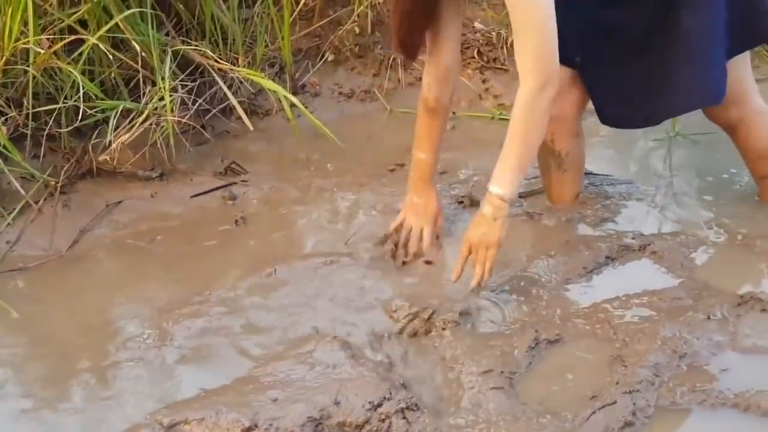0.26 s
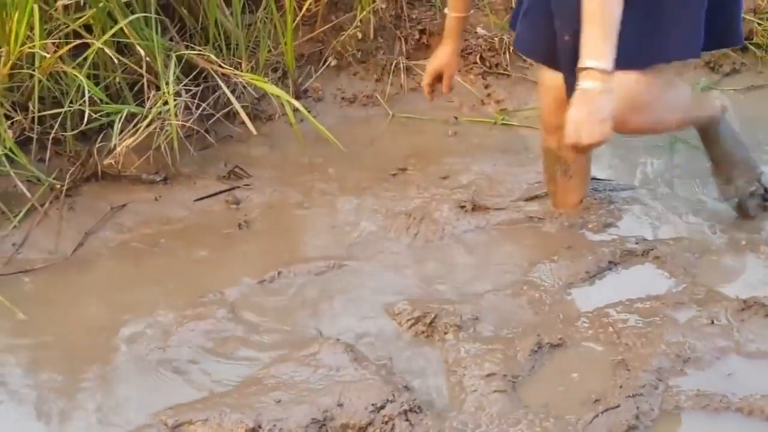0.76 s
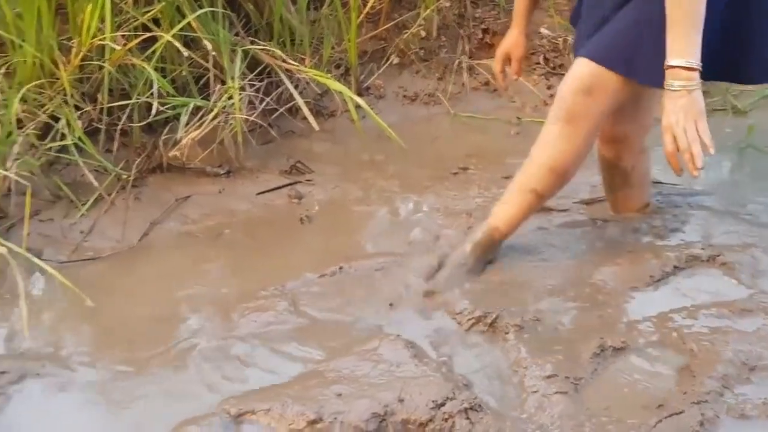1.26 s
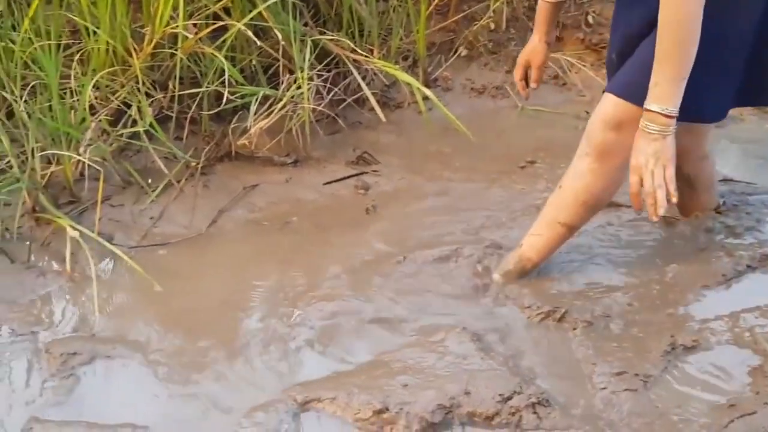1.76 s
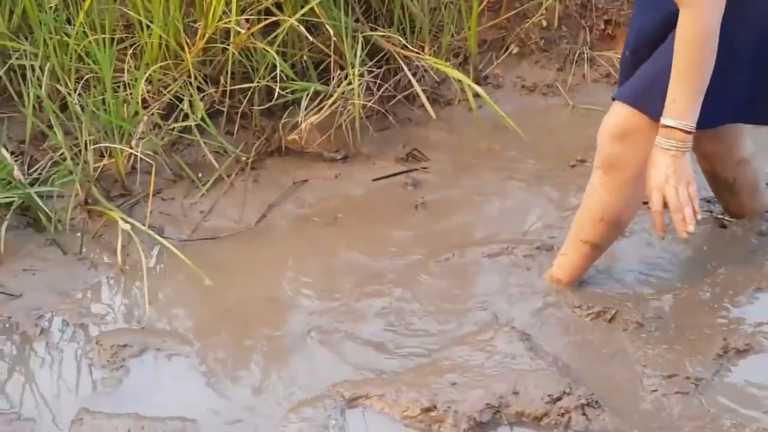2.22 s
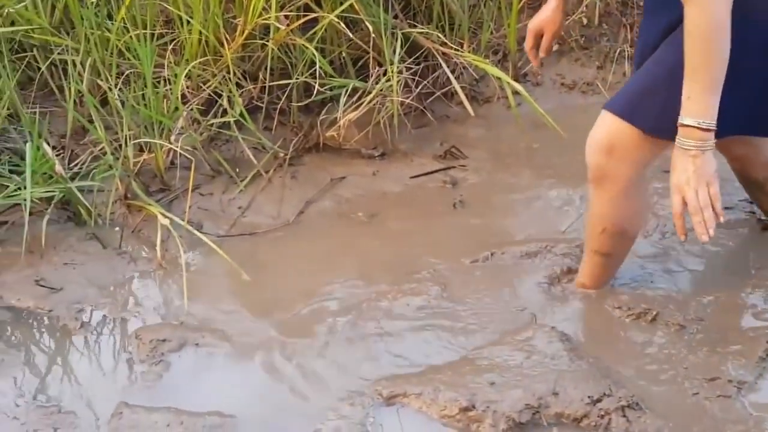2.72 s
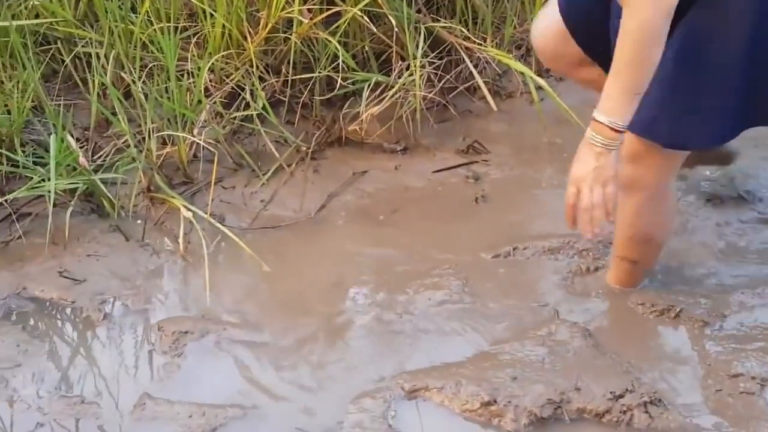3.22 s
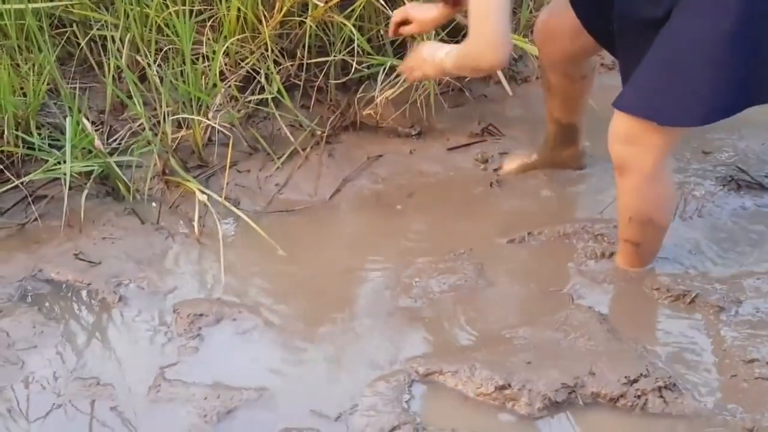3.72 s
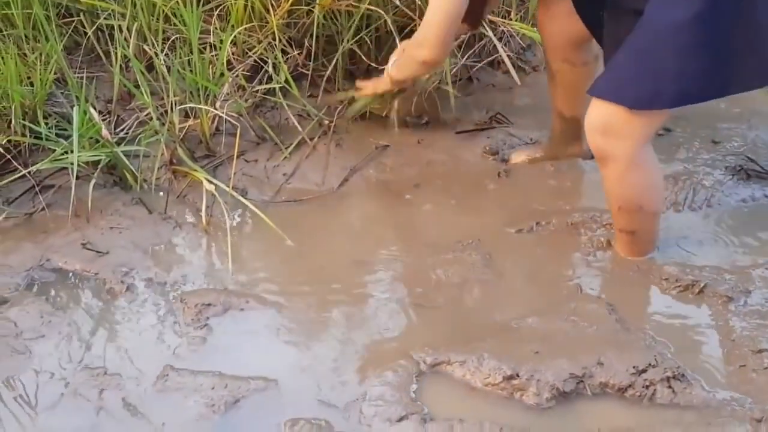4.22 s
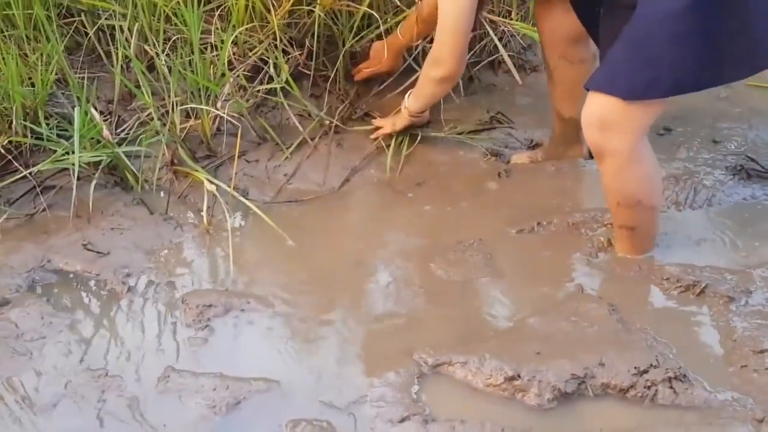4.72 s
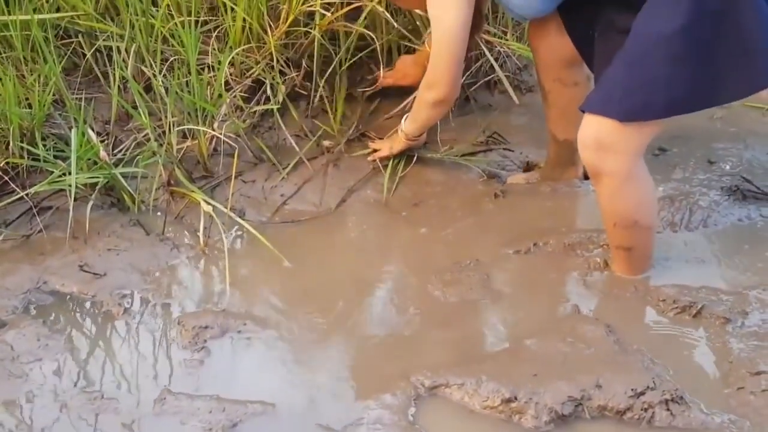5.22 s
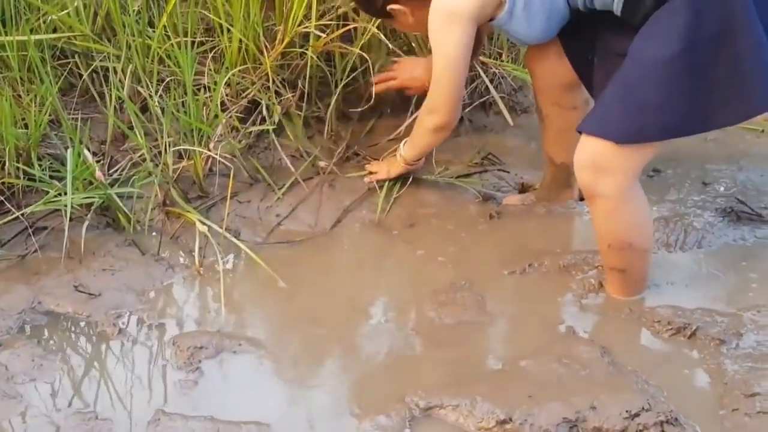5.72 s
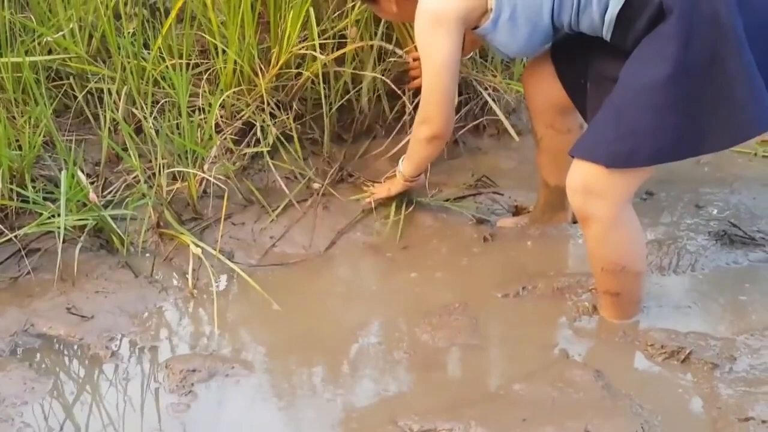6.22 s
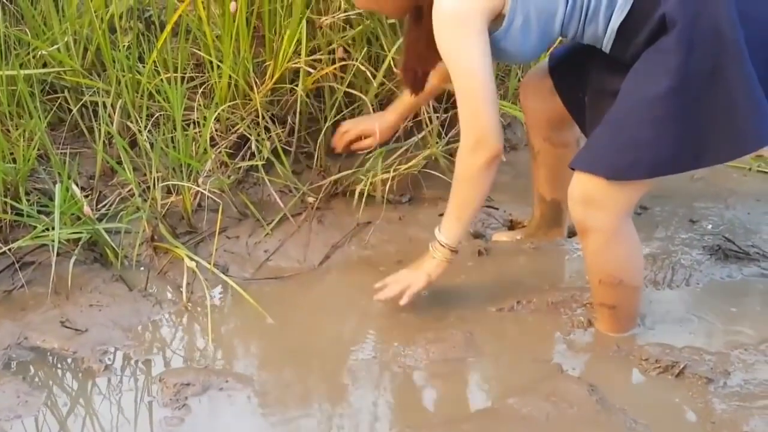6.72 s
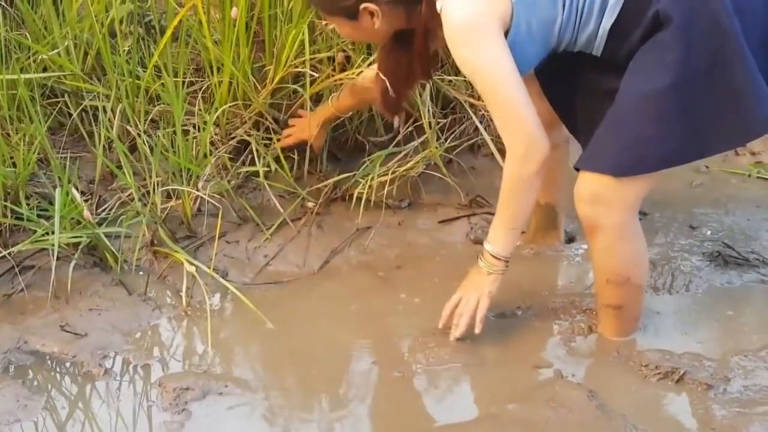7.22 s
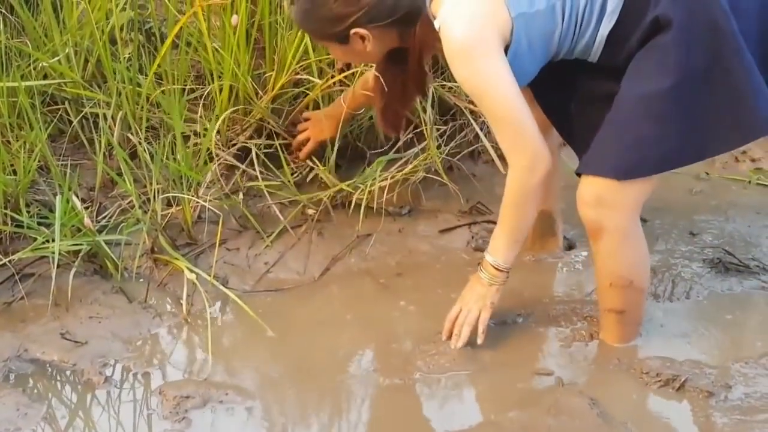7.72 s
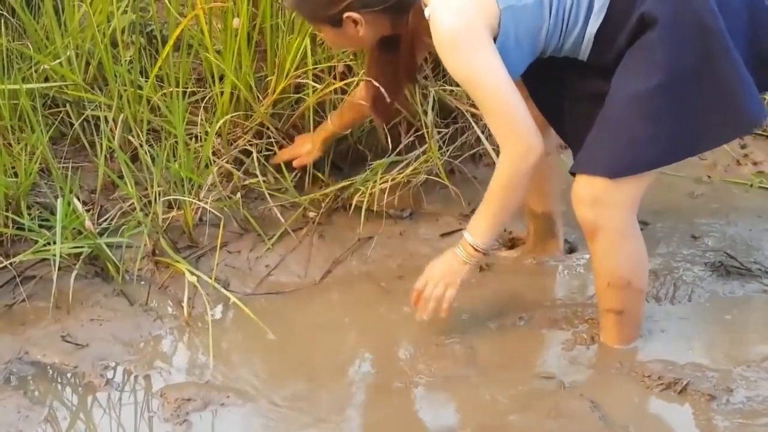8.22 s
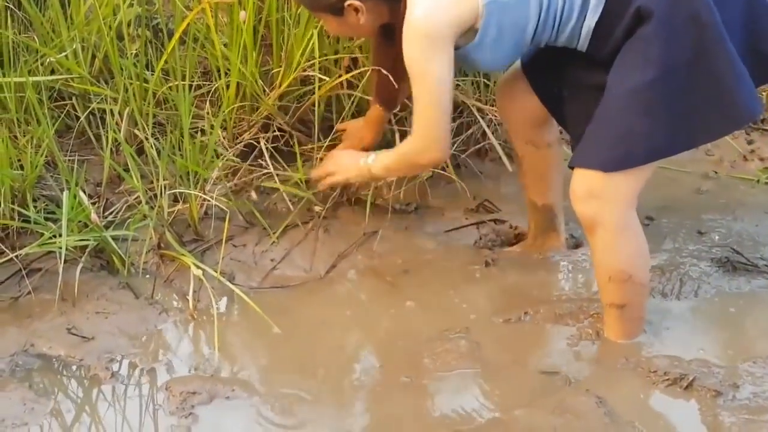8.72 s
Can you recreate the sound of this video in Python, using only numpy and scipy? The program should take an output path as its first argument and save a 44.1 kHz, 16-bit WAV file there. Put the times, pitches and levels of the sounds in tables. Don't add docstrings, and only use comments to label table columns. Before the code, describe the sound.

A wet, grassy field holds a continuous bright insect shimmer and a grainy far frog chorus, with small squeals throughout. From 0 to 1.5 s, dry leaves tick, stems snap and mud bubbles plop, while a small frog peeps faintly until 2.5 s. From 1.6 to 4.8 s a close frog on the right gives raspy, buzzing quacks, four to five per second, with crickets behind. Around 3-3.4 s a leg pushes through mud with a lumpy splash and plops; a sharp stem snap follows at 3.5 s. Tiny falling bird sweeps twitter at 4.7-5 s. Then it thins to chorus, squeals and brushed grass, with stems cracking near 6.1 s. From 6.4 to 7.9 s another frog quacks, overlapped by a deeper one until the end. Soft water stirs at 7 and 7.9 s. At 8.1-8.4 s gusts thud deeply on the left of the handheld microphone.

```python
import sys
import numpy as np
from scipy import signal
from scipy.io import wavfile
from scipy.ndimage import uniform_filter1d

SR = 44100
rng = np.random.default_rng(int(sys.argv[2]) if len(sys.argv) > 2 else 0)


def elevation(decibels):
    levels = np.asarray(decibels, float)
    return 10 ** (levels / 20)


def to_wav(sig):
    pcm = np.clip(np.atleast_2d(sig), -1, 1) * 32767
    pcm = np.round(pcm).astype(np.int16)
    wavfile.write(sys.argv[1], SR, pcm.T)


N = 395136

# frequency in Hz, level in dB.
FAR_INSECT_COLOUR = [(180, -62), (300, -14.5), (687, -18.5), (1270, -30), (1650, -21.5), (1830, -13.5),
                     (2230, -39), (3050, -14.5), (3670, -0.5), (5640, -23.5), (7860, -9.5), (8540, -16.5),
                     (9270, -13), (10600, -23.5), (15800, -47)]
CHORUS_COLOUR = [(820, -26.5), (1400, -16.5), (1860, -7.5), (2280, -8.5), (3140, 1), (3760, 1), (4340, -9),
                 (5200, -12.5), (6760, -29.5), (11400, -120)]
WIND_COLOUR = [(8.8, -42), (15, -47), (60, 3.5), (97, 2.5), (127, -1), (221, -18.5), (450, -33.5),
               (580, -71), (990, -120)]
BUFFET_COLOUR = [(10, -27), (22, -4), (40, 0), (55, -45)]
WADING_COLOUR = [(71, -30), (120, 22.5), (333, 0.5), (411, -18), (641, -0.5), (855, 2.5), (976, -2.5),
                 (1700, 2.5), (2210, -22), (3740, -120)]
GRASS_COLOUR = [(2650, -29), (4500, -1.5), (6460, -5.5), (7930, -0.5), (9380, -3.5), (10300, -2.5),
                (15000, -6), (15800, -5)]
# time in seconds, level in dB.
CHORUS_LEVEL = [(0.0, -49.5), (0.65, -56.5), (1.25, -48.5), (1.52, -55), (3.14, -54.5), (3.29, -48),
                (3.62, -57), (4.42, -53.5), (4.62, -56.5), (7.24, -56), (7.78, -49), (8.14, -57),
                (8.96, -49)]
# middle in seconds, half length in seconds, level in dB.
GUSTS = [
    (.85, 0.21, -60.5),
    (3.3, 0.088, -67),
    (4.5, 0.48, -61.5),
    (6.2, 0.15, -61),
    (8.08, 0.067, -52.5),
    (8.3, 0.072, -43),
    (8.55, 0.033, -52.5),
    (8.7, 0.075, -53),
]
# middle in seconds, half length in seconds, level in dB.
BUFFETS = [
    (.9, .5, -59),
    (8.3, 0.27, -52),
    (8.65, 0.12, -64),
]
# middle in seconds, half length in seconds, level in dB.
STEPS = [
    (.12, 0.1, -80),
    (0.758, 0.11, -83),
    (1.288, 0.1, -77),
    (2.988, 0.034, -60.5),
    (3.105, 0.055, -59.5),
    (3.278, 0.076, -53.5),
]
# middle in seconds, half length in seconds, level in dB.
STIRRING = [
    (5.08, 0.071, -66),
    (7.02, 0.079, -60),
    (7.86, 0.11, -61),
]
# middle in seconds, half length in seconds, level in dB.
BRUSHES = [(0.04, 0.072, -63.5), (0.346, 0.15, -62), (1.234, 0.29, -66.5), (3.116, 0.1, -62),
           (3.29, 0.1, -60), (3.517, 0.033, -56), (3.9, 0.061, -59), (4.353, 0.25, -60), (5.113, 0.13, -59),
           (5.966, 0.14, -56), (6.555, 0.16, -60.5), (7.064, 0.086, -58.5), (7.35, 0.17, -65.5),
           (7.602, 0.28, -63.5), (8.335, 0.2, -63.5), (8.63, 0.046, -55), (8.9, 0.38, -63)]
# frequency in Hz, width in Hz, level in dB.
THROAT_BANDS = [(3527, 327, 5), (2790, 920, -3), (3820, 1230, -2), (6540, 1140, -19.5)]
# start in seconds, effort in dB.
QUACKS_RIGHT = [(1.576, -43), (1.909, -34.5), (2.149, -33.5), (2.391, -34), (2.632, -34), (2.855, -33.5),
                (3.08, -33.5), (3.302, -34), (3.518, -34), (3.733, -34), (3.943, -34), (4.153, -34),
                (4.36, -33.5), (4.567, -34), (4.768, -34), (5.03, -45.5)]
QUACKS_BEHIND = [(.001, -40), (0.512, -49), (0.719, -41), (6.384, -38.5), (6.619, -38), (6.784, -41.5),
                 (6.946, -38.5), (6.991, -37.5), (7.17, -33.5), (7.351, -34), (7.521, -34.5),
                 (7.695, -33.5), (7.87, -33.5)]
QUACKS_DEEP = [
    (7.47, -49),
    (7.655, -45),
    (7.835, -47),
    (8.019, -40),
    (8.18, -38.5),
    (8.351, -38.5),
    (8.514, -38.5),
    (8.679, -39),
    (8.847, -39),
]
# effort in dB, length in seconds, low throat band in dB.
FULL_CALLS = [
    (-34, 0.06, -13),
    (-33.5, 0.052, -8.5),
    (-38.5, 0.081, -10.5),
]
# settled pulse rate in Hz, starting lift as a share, settling time in seconds,
# rise time in seconds, left-right balance in dB, throat size factor.
VOICES = [
    (436, .12, .012, .0015, -4.8, 1.0),
    (433, .14, .015, .003, 1, 1.0),
    (400, .25, .07, .015, 1, .87),
]
RASPS = (1.25, 1, 1.05)
# start in seconds, level in
# dB, pitch in Hz.
SNAPS = [(.001, -43, 3630), (.018, -29, 3420), (.308, -41, 4470), (.207, -31.5, 2640), (.297, -29, 1750),
         (.736, -51, 2510), (3.271, -33.5, 1680), (3.272, -47, 895), (3.496, -41, 2570),
         (3.5022, -22, 2730), (3.5024, -30, 1970), (3.667, -45, 1760), (3.668, -57, 3300),
         (6.119, -47, 3580), (6.171, -47, 1720), (6.172, -41, 3470)]
# start in seconds, level in dB, pitch in Hz.
TICKS = [(0.021, -44, 6000), (.062, -35, 9800), (0.1254, -40, 9300), (0.308, -29, 6200),
         (0.459, -47.5, 6200), (0.712, -39, 5600), (.854, -37, 9200), (1.176, -34, 5850),
         (1.1997, -34.5, 8700), (1.2985, -33.5, 10400), (1.335, -36, 6140), (1.585, -53, 4400),
         (3.496, -30, 7800), (3.806, -42, 8830), (7.6538, -41, 8340), (8.503, -39, 8500)]
# start in seconds, level in dB.
PEEPS = [(0.039, -60), (0.257, -58.5), (0.464, -60), (0.661, -58.5), (0.864, -54), (1.079, -57.5),
         (1.287, -56.5), (1.531, -60), (1.782, -60), (2.031, -59), (2.272, -59.5), (2.523, -66)]
# start in seconds, length in seconds, first pitch in Hz, last pitch in Hz, level in dB.
SLIDES = [(.06, 0.18, 615, 625, -67), (0.189, 0.076, 620, 609.4, -56.5), (.48, 0.089, 622, 613, -63),
          (0.547, 0.025, 616, 650, -55.5), (0.71, 0.16, 677, 647, -63.5), (1.055, 0.26, 649, 659, -65),
          (1.4, 0.21, 612, 630, -74), (2.68, 0.14, 606, 610, -65), (1.937, 0.18, 616, 634, -63.5),
          (2.102, 0.15, 641, 675, -51.5), (2.247, 0.07, 623, 613, -61.5), (3.197, 0.08, 600, 666, -58),
          (3.518, 0.085, 618, 637, -57), (4.09, 0.19, 617, 635, -72), (4.253, 0.25, 636, 669, -54.5),
          (5.383, 0.16, 611, 630, -60.5), (5.412, 0.13, 668, 661, -65), (6.301, 0.26, 610, 667.4, -56.5),
          (7.43, 0.12, 614, 630, -70), (7.74, 0.17, 627, 617, -63), (8.632, 0.13, 622, 637, -58.5),
          (8.765, 0.089, 635, 666, -52)]
# start in seconds, length in seconds, pitch in Hz, level in dB.
SQUEALS = [(0.077, 0.13, 624, -62), (0.532, 0.046, 595, -55), (0.684, 0.1, 668, -55),
           (0.707, 0.074, 647, -53.5), (0.785, 0.074, 634, -57), (1.166, 0.07, 665, -50),
           (1.256, 0.037, 662, -56), (1.46, 0.033, 624, -53.5), (1.548, 0.04, 618, -54.5),
           (1.68, 0.022, 617, -67), (1.719, 0.039, 587, -55), (5.33, 0.13, 621, -59.5),
           (2.622, 0.076, 649, -51), (2.7, 0.14, 613, -59.5), (3.196, 0.17, 650, -55.5),
           (3.295, 0.13, 674, -50), (3.473, 0.05, 620, -50), (3.812, 0.065, 621, -49),
           (4.112, 0.075, 672, -51.5), (4.15, .12, 639, -51), (4.415, 0.079, 716, -53),
           (4.954, 0.081, 660, -56.5), (5.275, 0.1, 646.6, -54), (5.49, 0.17, 674, -51),
           (5.398, 0.086, 655, -62), (8.099, 0.17, 640, -62), (5.79, 0.061, 622, -53),
           (6.271, 0.14, 619, -60), (6.55, 0.11, 638, -47.5), (6.842, 0.13, 612, -57.5),
           (6.928, 0.12, 665, -51.5), (7.606, 0.1, 658, -53), (7.687, 0.14, 673, -49.5),
           (8.241, 0.15, 614, -57.5), (8.769, 0.064, 622, -53.5), (6.442, 0.21, 700, -60),
           (6.4, 0.13, 638, -55.5), (8.637, 0.11, 664, -49), (8.788, 0.094, 699, -57)]
# start in seconds, level in dB, pitch in Hz.
PLOPS = [(.078, -46.5, 1080), (.138, -56, 1180), (.282, -36.5, 780), (.295, -36.5, 1380), (.345, -49, 1326),
         (.43, -54, 2170), (.63, -56, 1580), (.668, -52.5, 1630), (.734, -51, 1157), (.841, -59, 915),
         (1.167, -41.5, 1020), (1.2, -43, 800), (1.317, -51.5, 1000), (1.33, -53, 860), (1.409, -51, 710),
         (1.634, -55.5, 1080), (1.645, -60, 900), (1.672, -65, 1090), (2.943, -55, 1700), (2.955, -50, 884),
         (2.965, -31.5, 923), (2.978, -43, 633), (2.994, -48, 1375), (3.014, -45, 1216), (3.077, -47, 1200),
         (3.099, -45, 940), (3.121, -42, 923), (3.176, -43.5, 916), (3.191, -41, 570), (3.168, -46, 700),
         (3.204, -45, 800), (3.213, -47, 606), (3.232, -55, 890), (3.246, -48, 444), (3.248, -56, 1200),
         (3.326, -53, 900), (3.36, -51, 695), (3.29, -39, 300), (3.296, -38, 663), (3.333, -43, 515),
         (3.345, -45, 1100), (3.74, -59, 1050), (3.84, -65, 1020), (3.975, -48.5, 1580), (4.3, -54, 1390),
         (5.01, -48, 1464), (5.12, -54, 1140), (6.975, -50.5, 1110), (7.828, -54, 455)]
# start in
# seconds, length in seconds, first and last pitch in Hz, level in dB.
NOTES = [(.34, 0.072, 3270, 3430, -59), (1.245, 0.045, 3250, 3150, -64), (1.415, 0.049, 3230, 3100, -52),
         (1.589, 0.045, 3230, 3130, -55), (1.735, 0.048, 3180, 3110, -54), (4.955, 0.08, 2590, 2700, -57),
         (4.96, .035, 3010, 2980, -58), (5.03, .07, 3400, 3330, -61), (3.223, 0.015, 1820, 1860, -44),
         (5.762, 0.027, 3990, 3960, -47), (6.865, 0.017, 1720, 1700, -59), (5.14, 0.028, 3150, 3150, -57),
         (8.576, 0.042, 3300, 3180, -47.5), (8.849, 0.047, 3280, 3190, -47)]
# start in seconds, length in seconds, first and last pitch in Hz, level in dB.
GULPS = [
    (0.691, 0.048, 653, 1215, -66),
    (0.851, 0.03, 786, 1010, -65),
    (1.207, 0.013, 620, 1630, -48.5),
    (1.314, 0.029, 1200, 804, -69),
    (1.37, 0.019, 790, 1060, -60),
    (1.407, 0.04, 660, 1316, -60.5),
    (1.666, 0.0145, 950, 1250, -71),
    (2.589, 0.028, 1230, 1700, -72),
    (4.944, 0.053, 1400, 1900, -66),
]
NEAR_CHIRPS = [0.709, 1.106, 1.41, 1.58, 1.715, 2.03, 2.185, 2.335, 2.495, 2.645, 2.81, 2.946, 3.096, 3.25,
               3.415, 3.585, 3.766, 3.91, 4.054, 4.22, 4.375, 4.565, 4.725, 4.892, 5.28, 5.422, 5.564,
               5.739]
# start in seconds, end in seconds, level in dB.
BOUTS = [
    [(1.313, 3.565, -61.5)],
    [(7.17, 8.3, -70)],
    [(6.86, 7.17, -70), (7.32, 7.42, -69)],
]
# chirp period in seconds, chirp length in seconds, strokes per second,
# pitch in Hz, width in Hz.
CHIRPERS = [
    (.1135, .09, 128, 9300, 750),
    (.176, .05, 77, 6900, 350),
    (.105, .1, 70, 880, 230),
]
# start in seconds, level in dB.
TWEETS = [
    (4.688, -58),
    (4.719, -51),
    (4.752, -46.5),
    (4.79, -43.5),
    (4.902, -57),
    (4.937, -49),
    (4.971, -46.5),
]
# start in seconds, level in dB.
CHUCKS = [
    (4.752, -57.5),
    (4.94, -59.5),
]
# length in seconds, first pitch in Hz, last pitch in Hz.
TWEET_SHAPE = (0.0166, 5180, 4300)
CHUCK_SHAPE = (0.0195, 890, 1590)
# start in seconds, level in dB, pitch in Hz, time to fall 60 dB in seconds.
THUMPS = [
    (6.987, -45, 293, 0.19),
    (7.839, -50, 286, 0.18),
    (8.094, -29, 82.6, 0.35),
    (8.216, -20, 90.8, 0.3),
    (8.233, -16, 207, 0.07),
    (8.251, -18.5, 75.6, 0.16),
    (8.298, -20, 72, 0.11),
]


def evened(x):
    return x / np.sqrt(np.mean(x ** 2) + 1e-20)


def wander(n, span):
    return evened(uniform_filter1d(uniform_filter1d(rng.standard_normal(n), span), span))


def resonate(x, hz, width):
    turn = np.exp(2j * np.pi * np.cumsum(hz * np.ones(len(x))) / SR)
    r = np.exp(-np.pi * width / SR)
    return 2 * (turn * signal.lfilter([1 - r], [1, -r], x / turn)).real


def add(mix, s, sound, pan_db, lag=0):
    for side, late, sign in ((0, lag, 0.79), (1, 0, -1.1)):
        part = mix[side, round(s * SR) + late:][:len(sound)]
        part += elevation(sign * pan_db / 2) * sound[:len(part)]


def hiss(colour, level, same, pan_db, patchy_db, flicker_db, size):
    frames, hz = 2 * N // size + 5, np.fft.rfftfreq(size, 1 / SR)
    a, b, c, d, patches = rng.standard_normal((5, len(hz), frames), dtype=np.float32)
    patches = uniform_filter1d(uniform_filter1d(patches, size=5, axis=0), size=4, axis=1)
    f, db = np.transpose(colour)
    shape_db = np.interp(np.log(hz + 1), np.log(f + 1), db, -90, -90)[:, None]
    left = a + 1j * b
    right = same * left + np.sqrt(1 - same ** 2) * (c + 1j * d)
    gain_db = shape_db + patchy_db * evened(patches) + flicker_db * wander(frames, span=2)
    spectra = np.array([left, right]) * elevation(gain_db)
    sides = evened(signal.istft(spectra, window="cosine", nperseg=size)[1][:, :N])
    s, db = np.transpose(level)
    return sides * elevation([[pan_db / 2], [-pan_db / 2]]) * elevation(np.interp(np.arange(N) / SR, s, db))


def swells(rows, floor_db):
    t = np.linspace(0, N / SR, num=2000)
    power = sum(elevation(2 * db) * np.exp(-((t - s) / half) ** 2) for s, half, db in rows)
    return np.transpose([t, 10 * np.log10(power + elevation(2 * floor_db))])


def far_insects():
    level = [(0, -61.5), (9, -61.5)]
    return hiss(FAR_INSECT_COLOUR, level, 0, 1.5, patchy_db=1.5, flicker_db=.6, size=1024)


def far_chorus():
    return hiss(CHORUS_COLOUR, CHORUS_LEVEL, 0, .3, patchy_db=2.8, flicker_db=2.5, size=1024)


def wind():
    rumble = hiss(WIND_COLOUR, swells(GUSTS, -61.5), .5, 9, patchy_db=1.5, flicker_db=1, size=2048)
    beating = swells(BUFFETS, -77)
    return rumble + hiss(BUFFET_COLOUR, beating, .76, 1.7, patchy_db=.5, flicker_db=-2.5, size=4096)


def wading():
    strokes = swells(STEPS + STIRRING, -71.5)
    return hiss(WADING_COLOUR, strokes, .9, 1.5, patchy_db=3, flicker_db=3.5, size=256)


def brushed_grass():
    return hiss(GRASS_COLOUR, swells(BRUSHES, -71), .21, 3.1, patchy_db=4, flicker_db=.5, size=256)


def quack(db, low_db, length, hz, lift, settle, rise, throat, rasp=1):
    t = np.arange(0, length + .04, 1 / SR)
    unsteady = 1 + .013 * rasp * wander(len(t), span=100)
    pulse_hz = hz * rng.uniform(.94, 1.02) * (1 + lift * np.exp(-t / settle)) * unsteady
    turns = np.cumsum(pulse_hz) / SR
    at = np.flatnonzero(np.diff(np.floor(turns), prepend=-1))
    pulses = np.zeros(len(t))
    pulses[at] = (1 + .25 * (-1.) ** np.arange(len(at))) * elevation(2 * rng.standard_normal(len(at)))
    breath = .28 * rasp * rng.standard_normal(len(t))
    effort = [max(1.4 - 100 * rise, .1), 1.4, 1.05, .35, .05]
    drive = (evened(pulses) + breath) * np.interp(t, [0, rise, length - .008, length, length + .04], effort)
    mouth = throat * rng.uniform(.97, 1.03) * (1 - .02 * np.exp(-t / .03))
    bands = [(f * mouth, width / throat ** 8, g) for f, width, g in THROAT_BANDS]
    bands.append((1866 / throat, 380 / throat ** 6, low_db + 5))
    sound = np.zeros(len(t))
    for k, (f, width, g) in enumerate(bands):
        band = evened(resonate(resonate(drive, f, width), f, 2 * width))
        sound += (-1) ** k * elevation(g + 1.2 * rng.standard_normal()) * band
    return elevation(db - 9) * evened(sound)


def squeal(length, hz_from, hz_to, third_db, sixth_db, beat=0):
    n = round((length + .0185) * SR)
    t = np.arange(n) / SR
    hz = np.linspace(hz_from, hz_to, n) * (1 + .004 * wander(n, span=350))
    phase = 2 * np.pi * np.cumsum(hz) / SR
    levels = {3: third_db, 4: sixth_db - 19, 5: sixth_db - 20, 6: sixth_db, 7: sixth_db - 17}
    flutter_db = 2 * wander(n, span=60)
    sound = np.zeros(n)
    for k, db in levels.items():
        sound += elevation(db + 2 * wander(n, span=350) + flutter_db) * np.sin(k * phase)
    sound *= 1 + beat * np.sin(2 * np.pi * (38 * t + rng.random()))
    return np.sqrt(2) * sound * np.interp(t, [0, .02, length, length + .019], [0, .65, 1.15, 0])


def far_frog_crowd(near):
    for when, long, pitch, loud, side, sac in rng.random(size=(90, 6)):
        hz, db = 600 + 70 * pitch, -71 + 6 * loud
        call = squeal(.048 + .167 * long, hz, hz * 1.02, db - 23 + 9 * sac, db)
        add(near, when * N / SR, call, 12 * side - 6, round(24 * side))
    for when, long, pitch, loud, side in rng.random(size=(32, 5)):
        call = quack(-54 + 7 * loud, -12, .04 + .04 * long, 400 + 90 * pitch, .1, .02, .01, throat=.98)
        add(near, when * N / SR, call, 12 * side - 6, round(24 * side))
    wavering_hz = 1883 * (1 + .02 * wander(N, span=6000))
    drone = evened(resonate(rng.standard_normal(N), wavering_hz, width=51))
    add(near, 0, elevation(-68.5) * drone, 2, lag=8)


def quacking_frogs(near):
    callers = zip((QUACKS_RIGHT, QUACKS_BEHIND, QUACKS_DEEP), FULL_CALLS, VOICES, RASPS, (10, 22, 22))
    for rows, (full_db, length, low_db), voice, rasp, lag in callers:
        hz, lift, settle, rise, pan_db, throat = voice
        for s, db in rows:
            weak = full_db - db
            long = max(length - .03 * weak, .037)
            slow = np.clip(rise + .002 * weak, .001, .024)
            call = quack(db, low_db + .18 * weak, long, hz, lift, settle, slow, throat, rasp)
            add(near, s, call, pan_db, lag)


def ring(db, hz, t60, glide, rough):
    t = np.arange(0, t60, 1 / SR)
    tone = np.sin(2 * np.pi * hz * (t + glide * t ** 2 / t60))
    puff = evened(resonate(resonate(rng.standard_normal(len(t)), hz, hz), hz, hz))
    onset = np.sin(np.pi / 2 * np.minimum(t * hz / 1.5, 1)) ** 2
    struck = elevation(db - 60 * t / t60) * (tone + rough * puff) * onset
    return signal.lfilter(*signal.butter(3, 1.2 * hz / SR, "high"), struck)


def longer_if_faint(t60, db):
    return t60 + .0012 * max(-33 - db, 0)


def snapping_stems(near):
    for s, db, hz in SNAPS:
        add(near, s, ring(db, hz, longer_if_faint(.011, db), glide=.05, rough=.5), 1.5)


def droplets(near):
    for (s, half, db), drops in zip(STEPS, rng.random(size=(len(STEPS), 9, 3))):
        for when, pitch, loud in drops:
            drop = ring(db + 7.5 + 10 * loud, 462 * 3 ** pitch, .014, glide=.16, rough=.89)
            add(near, s + half * (2 * when - 1), drop, 1)


def ticking_leaves(near):
    for s, db, hz in TICKS:
        add(near, s, ring(db - 21, hz, .018, glide=.05, rough=4.5), 3, lag=8)


def whistle(length, hz_from, hz_to, db, count):
    along = np.linspace(0, 1, round(length * SR), endpoint=False)
    steps = uniform_filter1d((np.floor(along * count) + .5) / count, size=120)
    tone = np.sin(2 * np.pi * np.cumsum(hz_from + (hz_to - hz_from) * steps) / SR)
    swell = signal.windows.tukey(len(along), .3) * (.45 + .55 * along)
    return np.sqrt(2) * elevation(db) * tone * swell


def peeping_frog(near):
    for s, db in PEEPS:
        add(near, s, whistle(.09, 3220, 2820, db + 4, count=3), pan_db=3.5 + 6 * s)


def squealing_frogs(near):
    for s, *call, db in SLIDES:
        add(near, s - .01, squeal(*call, db + 1, db - 5, beat=.55), 3, lag=19)
    for s, long, hz, db in SQUEALS:
        call = squeal(long, hz, hz + 60 * long, db - 12, db)
        add(near, s - .01, call, 1, lag=22 * (hz > 666))


def mud_plops(near):
    for s, db, hz in PLOPS:
        add(near, s, ring(db, hz, longer_if_faint(.034, db), glide=.16, rough=.45), 1.5)


def gulps_and_notes(near):
    for s, *note, db in GULPS + NOTES:
        add(near, s, whistle(*note, db, count=8), 1.5)


def cricket(start, end, period, length, strokes, hz, width, db):
    t = np.arange(0, end - start, 1 / SR)
    inside = t % period
    chirps = np.sin(np.pi * np.clip(inside / length, 0, 1)) ** .5
    bout = signal.windows.tukey(len(t), .1) * np.linspace(.7, 1.1, len(t))
    scrape = np.cos(np.pi * strokes * inside) ** 4 * rng.standard_normal(len(t))
    wing = evened(resonate(resonate(scrape, hz, width), hz, 2 * width))
    return elevation(db) * wing * chirps * bout


def chirpers(near):
    for s in NEAR_CHIRPS:
        add(near, s, cricket(0, .065, .07, .065, 77, 6950, 400, db=-65.5), 1.5)
    for bouts, kind in zip(BOUTS, CHIRPERS):
        for start, end, db in bouts:
            add(near, start, cricket(start, end, *kind, db), 1.5, lag=6)


def birds(near):
    for rows, sweep in ((TWEETS, TWEET_SHAPE), (CHUCKS, CHUCK_SHAPE)):
        for s, db in rows:
            add(near, s, whistle(*sweep, db, count=40), 1)


def wind_thumps(mix):
    for s, db, hz, t60 in THUMPS:
        add(mix, s, ring(db - 5, hz, t60, glide=-.1, rough=.08), 12, lag=42)


def reeds(x):
    t = np.arange(round(.25 * SR)) / SR
    tail = rng.standard_normal((2, len(t))) * elevation(-60 * t / .17) * (t > .003)
    return signal.fftconvolve(x, tail / np.linalg.norm(tail[0]), axes=1)[:, :N]


def scene():
    near = np.zeros((2, N))
    for source in (far_frog_crowd, quacking_frogs, snapping_stems, droplets, ticking_leaves, peeping_frog,
                   squealing_frogs, mud_plops, gulps_and_notes, chirpers, birds):
        source(near)
    mix = far_insects() + far_chorus() + wind() + wading() + brushed_grass()
    wind_thumps(mix)
    return mix + near + elevation(-7) * reeds(near)


def band_limit(x):
    return signal.sosfilt(signal.butter(12, 15800, fs=SR, output="sos"), x)


def record(dry):
    return band_limit(dry)


dry = scene()
out = record(dry)
to_wav(out)
```